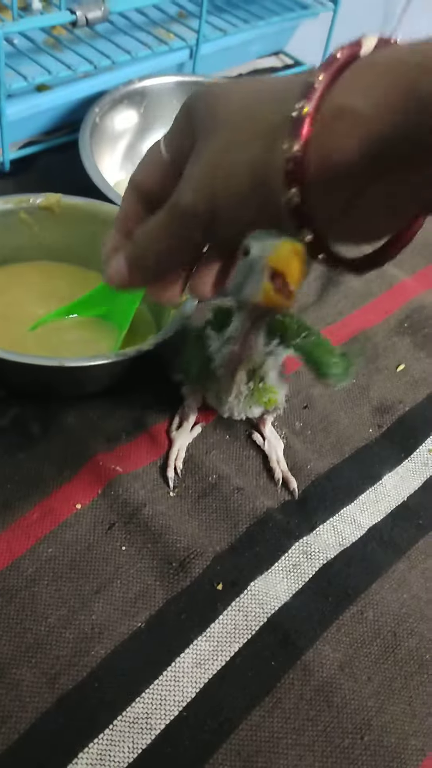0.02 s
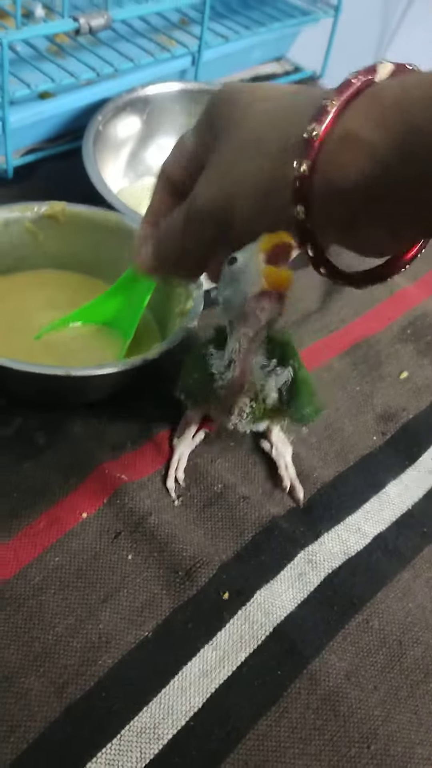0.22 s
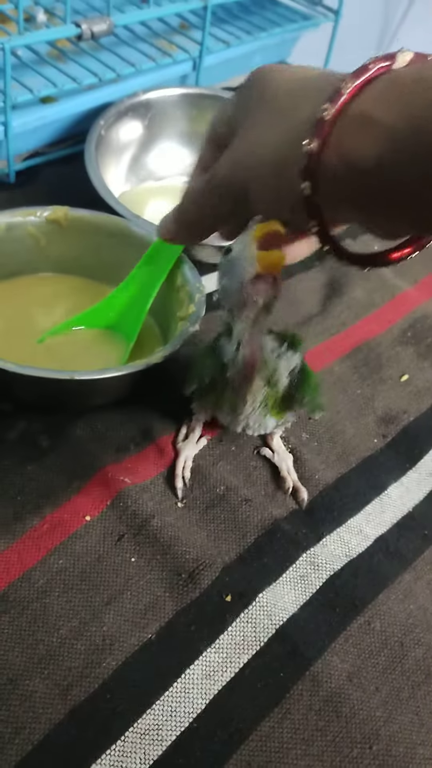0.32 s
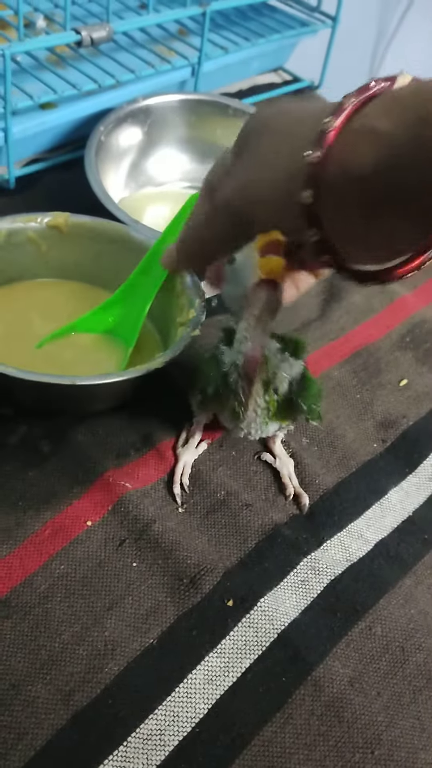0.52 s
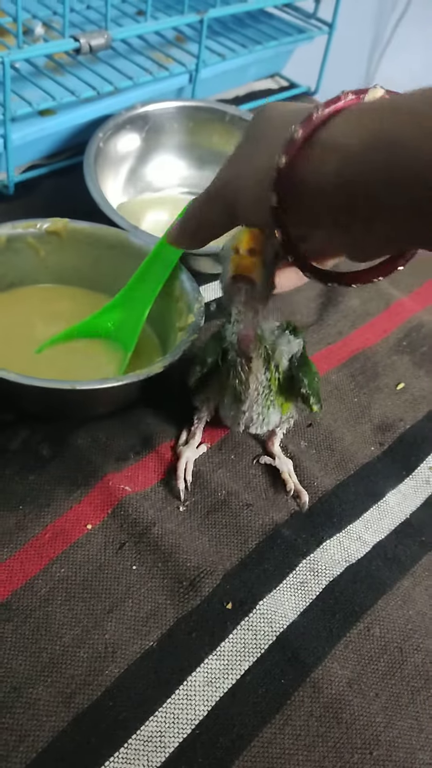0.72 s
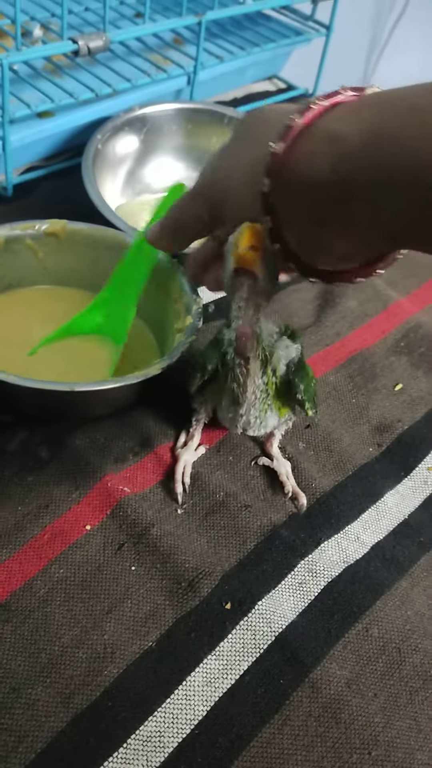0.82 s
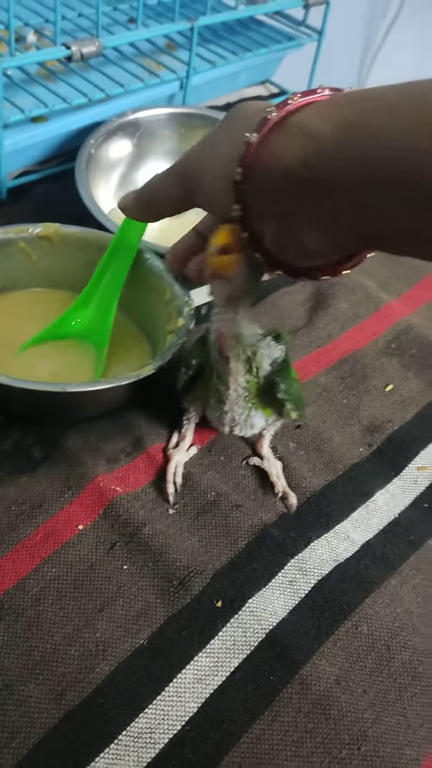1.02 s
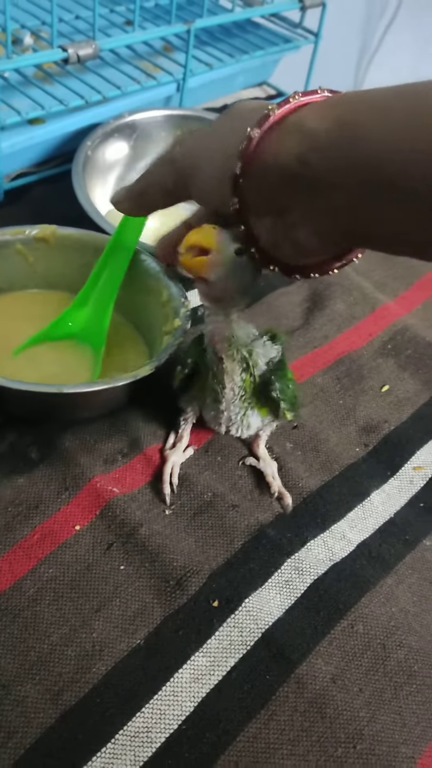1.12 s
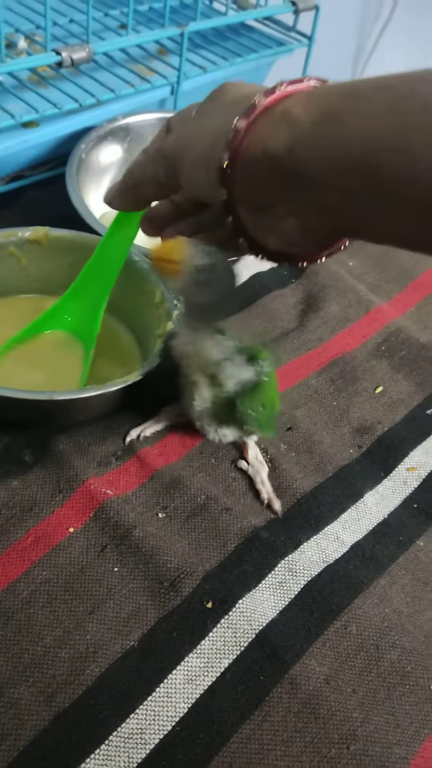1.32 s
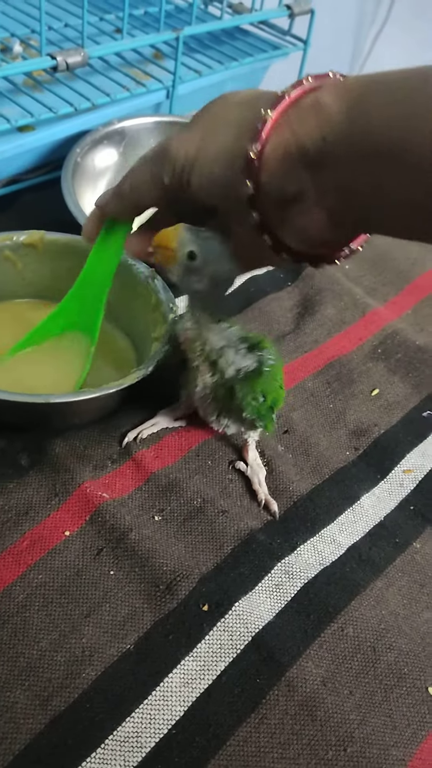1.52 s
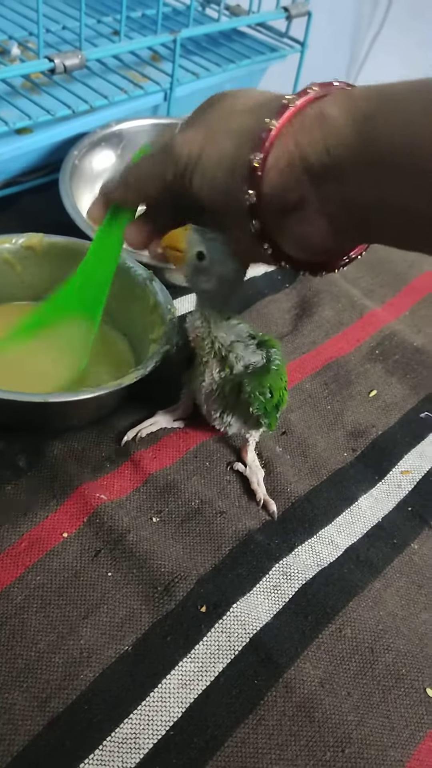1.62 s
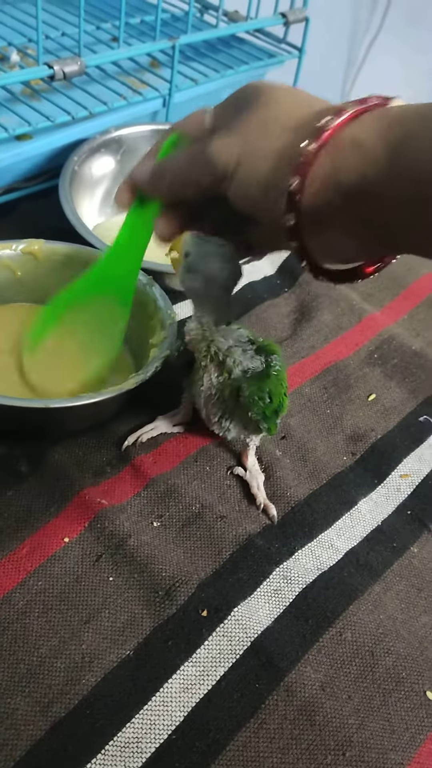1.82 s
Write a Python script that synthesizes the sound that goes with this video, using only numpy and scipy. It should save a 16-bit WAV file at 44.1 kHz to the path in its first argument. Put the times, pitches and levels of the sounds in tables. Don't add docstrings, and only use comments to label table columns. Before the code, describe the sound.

A parrot chick gives two harsh, rising begging cries close up, over fan hum and buffeting draught.

```python
import sys
import numpy as np
from scipy import signal
from scipy.fft import rfft, irfft, next_fast_len
from scipy.io import wavfile
from scipy.ndimage import uniform_filter1d

SR = 44100
rng = np.random.default_rng(int(sys.argv[2]) if len(sys.argv) > 2 else 0)


def materialize(psi):
    bounded = np.clip(np.atleast_2d(psi).T, -1, 1)
    quanta = np.round(bounded * 32767).astype(np.int16)
    wavfile.write(sys.argv[1], SR, quanta)


def field_ratio(decibels):
    return 10 ** (np.asarray(decibels, dtype=float) / 20)


N = 83790

# (f/Hz, level/dB)
FAN_COLOUR = [(59, -49.5), (100, -3), (246, -5.5), (700, -16.5), (811, -10.5), (1620, -19), (2310, -23),
              (13700, -46), (14900, -62)]
# (f/Hz, share)
LIKENESS = [(60, 1), (240, 0.86), (930, -0.086), (3660, -0.019), (14400, 0.0063)]
# (start t/s, length t/s, f/Hz, level/dB)
FAN_HUM = (.11, .14, 193, -45)
# (t/s, level/dB)
GUST_LEFT = [(0, -34), (.25, -57.5), (.5, -49.5), (.7, -45.5), (1.1, -56), (1.35, -50), (1.6, -52),
             (1.9, -52.5)]
GUST_RIGHT = [(0, -43.5), (.2, -66.5), (.4, -42.5), (.6, -65.5), (.77, -46), (.88, -54), (1.0, -41),
              (1.12, -55.5), (1.2, -43), (1.3, -54.5), (1.9, -60)]
# (t/s, peak level/dB, f/Hz, length t/s)
PUFFS = [(.005, -33, 47.5, 0.091), (0.109, -32.5, 113, 0.011), (0.13, -36.5, 84.3, 0.037),
         (0.211, -28, 76, 0.017), (0.364, -38, 57.6, 0.047), (0.585, -25, 67.8, 0.062),
         (0.67, -28, 98, 0.0099), (0.714, -33.5, 44.8, 0.0454), (0.758, -38.5, 73.3, 0.051),
         (0.838, -37.5, 97.6, 0.02), (0.901, -39, 102.7, 0.02), (0.984, -38, 71, 0.035),
         (1.182, -40.5, 93, 0.017), (1.308, -35, 63, 0.018), (1.361, -40, 36.3, 0.077),
         (1.781, -35, 55.7, 0.029), (1.858, -42.5, 109, 0.014)]
# (f/Hz, level/dB)
LEFT_LOUDER = [
    [(700, 1), (1700, 2.5), (2400, 0), (3200, -4), (4300, -11), (5600, -8), (8000, 4), (13000, 2)],
    [(700, 1), (1700, 2), (2400, 3), (2950, 0), (4300, -9), (6300, -11), (7500, -2), (7900, 20), (8700, 20),
     (9200, 3), (13000, 0)],
]
# (f/Hz, lead/rad)
LEFT_LEAD = [
    [(0, 0), (950, 1.4), (1950, 2.3), (2280, 3.14), (2600, 3.8), (3100, 4), (4300, 5.8), (5940, 9.6),
     (6890, 12.8), (14600, 30)],
    [(0, 0), (950, 1.5), (2650, 2.2), (2900, 3.14), (3150, 4), (3500, 4.4), (5860, 9.2), (7920, 16),
     (14600, 33)],
]
# (t/s, level/dB, length t/s)
BEAK_TICKS = [
    (.187, -53.5, 0.0033),
    (1.026, -58.5, .008),
]
# (t/s, f/Hz)
PITCH_1 = [(.195, 1090), (.22, 1270), (.27, 1300), (.338, 1367), (.362, 1425), (.382, 1545), (.404, 1735),
           (.418, 1735), (.434, 1796), (.46, 1845), (.472, 1975), (.482, 1750), (.491, 950), (.5, 620)]
PITCH_2 = [(1.058, 970), (1.09, 1090), (1.102, 1167), (1.126, 1251), (1.146, 1298), (1.168, 1386),
           (1.202, 1610), (1.228, 1722), (1.264, 1813), (1.272, 1951), (1.285, 2100), (1.294, 2150),
           (1.301, 1980), (1.309, 1050), (1.32, 720)]
# (t/s, level/dB)
EFFORT = [
    [(0.196, -89.5), (0.203, -37.5), (0.216, -33), (0.25, -27.5), (0.34, -19.5), (0.37, -25), (0.496, -30),
     (0.504, -56.5)],
    [(1.056, -100), (1.062, -37.5), (1.07, -28.5), (1.104, -25.5), (1.166, -31), (1.316, -30), (1.324, -12)],
]
# (t/s, roughness 0-1, half-pitch share 0-1)
MEMBRANES_1 = [(.2, .95, .3), (.27, .85, .3), (.3, .68, .3), (.345, .62, .15), (.38, .65, .2),
               (.4, .36, .85), (.455, .24, .85), (.466, .4, .1), (.478, .5, 0), (.49, .93, 0)]
MEMBRANES_2 = [(1.06, .3, .5), (1.076, .45, .5), (1.084, .92, .4), (1.11, .66, .35), (1.15, .45, .3),
               (1.18, .25, .12), (1.22, .06, 0), (1.264, .05, 0), (1.27, .55, .4), (1.286, .4, .35),
               (1.296, .3, 0), (1.306, .9, 0)]
# (above f/Hz, below f/Hz, extra share)
STEADY = [
    [(900, 1550, .25), (3800, 4750, .65)],
    [(1900, 3300, 1.3)],
]
# (from t/s, to t/s, above f/Hz, below f/Hz, share)
THIRD_PULSES = (.275, .365, 1550, 3200, 1.1)
# (t/s, extra level/dB)
SNAPS = [
    (1.0803, 8),
    (1.0945, 5),
    (1.1186, 6),
    (1.1297, 10),
    (.339, 1),
    (.497, 4),
]
# (f/Hz, half width f/Hz, level/dB)
WINDPIPE = [(973, 240, 10), (1815, 250, 15), (2364, 130, 2.5), (6064, 172, 4.5), (6960, 50, 8.5)]
# (f/Hz, level/dB)
THROAT = [(700, -10.5), (1700, -9.5), (2600, 2.5), (3300, 4), (5500, 4), (7400, -7), (12800, -23),
          (14500, -17)]
# (from t/s, f/Hz, half width f/Hz, level/dB)
DEAD_BANDS = [
    [(.238, 9600, 1000, -45), (.45, 14300, 500, -30)],
    [(1.07, 14800, 600, -30), (1.07, 8300, 600, -12), (1.1, 10900, 300, -24), (1.14, 9300, 200, -20),
     (1.24, 11700, 300, -25), (1.2, 10200, 400, -10)],
]
# (t/s, beak ring f/Hz, beak ring level/dB, whistle level/dB, treble level/dB)
MOUTH_1 = [(.2, 4460, -8, -24.5, -26), (.226, 4600, 4.5, -32.5, -17), (.24, 4490, -0.5, -24.5, -2.5),
           (0.271, 4060, -1, -37, 3.5), (.33, 4100, 12.5, -31.5, 11.5), (0.377, 4200, 8, -14.5, -1.5),
           (0.409, 4270, 10, -4.5, 14.5), (0.456, 4400, 13.5, -3.5, 9), (0.473, 4560, -3, -11.5, 12.5),
           (0.498, 4510, 15.5, -14, -4)]
MOUTH_2 = [(1.062, 4480, 18.5, -21, 33), (1.085, 4350, 15, -26, 16), (1.109, 4580, 18, -33, 15),
           (1.127, 4210, 16.5, -54, 25), (1.159, 4146, 0, -59, 22), (1.21, 4410, -6.5, -10, 5),
           (1.25, 4210, 13, -10.5, -2.5), (1.281, 4250, 6, -30, 24), (1.294, 4340, -5.5, -19.5, 12.5),
           (1.316, 4550, 13, -11.5, 15)]
# (f/Hz, half width f/Hz)
TREBLE = [
    (12900, 1700),
    (13150, 950),
]

TIME = np.arange(N) / SR
PARTIALS_TOP_HZ = 7650


def rms_one(x):
    return x / np.sqrt(np.mean(x ** 2) + 1e-20)


def in_time(rows):
    s, *columns = np.transpose(rows)
    return [np.interp(TIME, s, column) for column in columns]


def at_hz(points, hz):
    table_hz, value = np.transpose(points)
    return np.interp(np.log(hz + 1), np.log(table_hz + 1), value)


def shaped(x, response):
    size = next_fast_len(N + SR)
    hz = np.arange(size // 2 + 1) * SR / size
    return irfft(rfft(x, size) * response(hz), size)[..., :N]


def band(x, low_hz, high_hz):
    return shaped(x, lambda f: 1 / (1 + (f / high_hz) ** 12) / (1 + (low_hz / (f + 1)) ** 12))


def drift(rate_hz):
    r = np.exp(-2 * np.pi * rate_hz / SR)
    wander = signal.lfilter([1], [1, -2 * r, r * r], rng.standard_normal(N + SR))
    return rms_one(wander[SR:])


def fan_hiss():
    mid, side = rng.standard_normal((2, N))

    def colour(f):
        return field_ratio(at_hz(FAN_COLOUR, f)) * (f > 60)

    def alike(f):
        return np.clip(at_hz(LIKENESS, f), -1, 1)

    mid = shaped(mid, lambda f: colour(f) * np.sqrt(1 + alike(f)))
    side = shaped(side, lambda f: colour(f) * np.sqrt(1 - alike(f)))
    flicker_db = .6 * drift(8)
    return field_ratio(-51 + flicker_db) * rms_one(mid + side * [[1], [-1]])


def ducked(hiss):
    crying = sum((TIME > rows[0][0]) * (TIME < rows[-1][0]) for rows in EFFORT)
    duck_db = -30 * uniform_filter1d(1. * crying, size=200)
    top = shaped(hiss, lambda f: f > 7500)
    return hiss + top * (field_ratio(duck_db) - 1)


def fan_hum():
    start, length, hz, db = FAN_HUM
    swell = np.sin(np.pi * np.clip((TIME - start) / length, 0, 1)) ** .5
    return field_ratio(db) * swell * np.sin(2 * np.pi * hz * TIME)


def draught(gusts):
    low = shaped(rng.standard_normal(N), lambda f: f / (f + 15) / (1 + (f / 16.9) ** 1.413))
    lumps_db = 4.5 * drift(23.63)
    return rms_one(low) * field_ratio(in_time(gusts)[0] + lumps_db + 0.5)


def puffs():
    out = 0
    for s, db, hz, length in PUFFS:
        part = np.clip((TIME - s) / length, 0, 1)
        swell = np.sin(np.pi * part ** 0.55)
        swing = np.sin(2 * np.pi * hz * (TIME - s) * (1.2 - 0.45 * part))
        out = out + field_ratio(db) * swell * np.tanh(3.57 * swing)
    soft = signal.sosfilt(signal.butter(2, 320, fs=SR, output="sos"), out)
    return soft * field_ratio(np.array([[0], [-22]]))


def room(x):
    t = np.arange(SR) / SR
    t60_s, level_db = 0.29, -16
    white = rng.standard_normal((2, SR))
    dull = signal.lfilter(*signal.butter(1, 5500, fs=SR), white)
    echoes = dull + .5 * (white - dull) * np.exp(-t / 0.024)
    tail = echoes * field_ratio(-60 * t / t60_s) * (t > .003)
    tail = tail / np.sqrt(np.sum(tail ** 2) / 2)
    return field_ratio(level_db) * signal.fftconvolve(x, tail, axes=1)[:, :N]


def ports(x, louder, lead):
    side = np.array([[.5], [-.5]])
    apart = shaped(x[1], lambda f: field_ratio(1.4 * (f > 7500) - 14 * (f < 3200)))
    return shaped(x[0] + 2 * side * apart,
                  lambda f: field_ratio(side * at_hz(louder, f)) * np.exp(1j * side * at_hz(lead, f)))


def beak_ticks():
    swell = sum(field_ratio(db) * np.exp(-((TIME - s) / length) ** 2) for s, db, length in BEAK_TICKS)
    bright = signal.butter(2, [2000, 9000], "band", fs=SR, output="sos")
    return rms_one(signal.sosfilt(bright, rng.standard_normal(N))) * swell


def patchy(x):
    width_hz = 600
    for low_hz in np.arange(7800, 15000, width_hz):
        swing = field_ratio(5 * np.clip(drift(14), -4, 1.5)) - 1
        x = x + swing * shaped(x, lambda f: (f >= low_hz) * (f < low_hz + width_hz))
    return x


def membranes(hz, turns, rough, half, steady):
    pulses = 0
    for k in range(1, 21):
        fade = (k * hz < 16000) / np.hypot(1, (k * hz / PARTIALS_TOP_HZ) ** 4)
        pulses = pulses + np.cos(2 * np.pi * k * turns) * fade
    pulses = rms_one(pulses)

    breath_share = .5
    cycle = np.round(turns).astype(int)
    every_other = 1 - half + half * (-1.) ** cycle
    uneven = rng.standard_normal(N)[cycle]
    strength = np.sqrt(1 - rough ** 2) * every_other + rough * (1 - breath_share) * uneven
    breath = rough * (1 + .5 * np.cos(2 * np.pi * turns)) * rng.standard_normal((2, N))
    source = np.array([pulses * strength + breath_share * breath[0], field_ratio(-3) * breath[1]])
    source = source * field_ratio(0.5 * rough * np.clip(drift(140), -3, 1.5))
    rush = shaped(rng.standard_normal((2, N)), lambda f: f > PARTIALS_TOP_HZ)
    source = source + .22 * rush * [[1], [.5]]
    source = shaped(source, lambda f: field_ratio(sum(
        db / (1 + ((f - peak_hz) / width_hz) ** 2) for peak_hz, width_hz, db in WINDPIPE)))

    even = pulses * rough * np.sqrt(1 - rough ** 2)
    held = sum(share * band(even, low_hz, high_hz) for low_hz, high_hz, share in steady)
    start, end, low_hz, high_hz, share = THIRD_PULSES
    thirds = np.cos(2 * np.pi * turns / 3) * (TIME > start) * (TIME < end)
    held = held + share * band(pulses * thirds, low_hz, high_hz)
    return patchy(source + [[1], [0]] * held)


def throat(source, dead):
    smear_s = 0.0015
    out = shaped(source, lambda f: field_ratio(at_hz(THROAT, f)) * np.exp(-1j * np.pi * smear_s * f ** 2 / 8000))
    for s, dead_hz, width_hz, db in dead:
        cut = shaped(out, lambda f: 1 - field_ratio(db * np.exp(-((f - dead_hz) / width_hz) ** 6)))
        out = out - cut * np.clip((TIME - s) / .01, 0, 1)
    return out


def beak(x, ring_hz):
    width_hz = 530
    spin = np.exp(2j * np.pi * np.cumsum(ring_hz) / SR)
    r = np.exp(-np.pi * width_hz / SR)
    return 2 * np.real(spin * signal.lfilter([1 - r], [1, -r], x / spin))


def cry(pitch, effort, voice, mouth, dead, steady, bright):
    (hz,), (level_db,), (rough, half) = map(in_time, (pitch, effort, voice))
    ring_hz, ring_db, whistle_db, treble_db = in_time(mouth)
    wobble = 0.03036 * rough * drift(296)
    turns = np.cumsum(hz * (1 + wobble)) / SR
    throaty = throat(membranes(hz, turns, rough, half, steady), dead)
    treble = shaped(throaty, lambda f: np.exp(-((f - bright[0]) / bright[1]) ** 2))
    voiced = throaty + (field_ratio(ring_db) - 1) * beak(throaty, ring_hz) + (field_ratio(treble_db) - 1) * treble
    voiced = voiced / np.sqrt(uniform_filter1d(voiced[0] ** 2, size=900) + 1e-9)
    share = np.clip(field_ratio(whistle_db), 0, .95)
    whistle = [[np.sqrt(2)], [0]] * share * np.cos(2 * np.pi * turns)
    voiced = voiced * np.sqrt(1 - share ** 2) + whistle
    snap_db = sum(db * np.exp(-((TIME - s) / .0007) ** 2) for s, db in SNAPS)
    closing = np.clip((pitch[-1][0] - TIME) / .003, 0, 1)
    return voiced * field_ratio(level_db + snap_db) * (TIME > effort[0][0]) * closing


def scene():
    first = cry(PITCH_1, EFFORT[0], MEMBRANES_1, MOUTH_1, DEAD_BANDS[0], STEADY[0], TREBLE[0])
    second = cry(PITCH_2, EFFORT[1], MEMBRANES_2, MOUTH_2, DEAD_BANDS[1], STEADY[1], TREBLE[1])
    first = first + beak_ticks() * [[1], [.4]]
    bird = ports(first, LEFT_LOUDER[0], LEFT_LEAD[0]) + ports(second, LEFT_LOUDER[1], LEFT_LEAD[1])
    bird = field_ratio(-0.5) * bird
    wind = np.array([draught(GUST_LEFT), draught(GUST_RIGHT)]) + puffs()
    return bird + room(bird) + ducked(fan_hiss()) + wind + fan_hum()


def top_cut(x):
    return signal.sosfilt(signal.butter(12, 15030, fs=SR, output="sos"), x)


def record(dry):
    mix = shaped(dry, lambda f: f < 14450)
    return top_cut(mix)


dry = scene()
out = record(dry)
materialize(out)
```